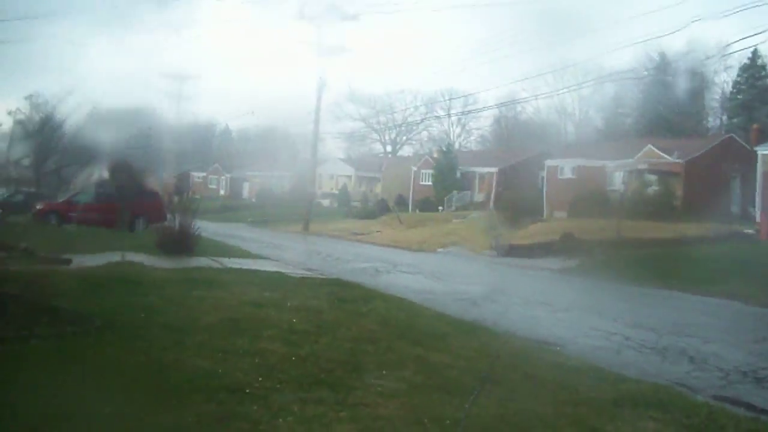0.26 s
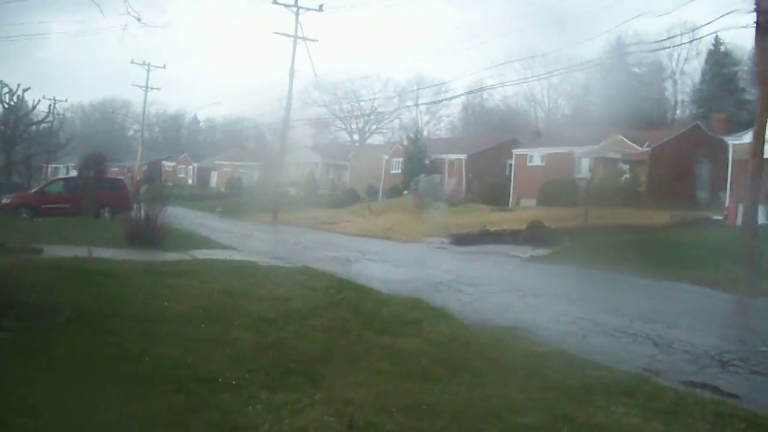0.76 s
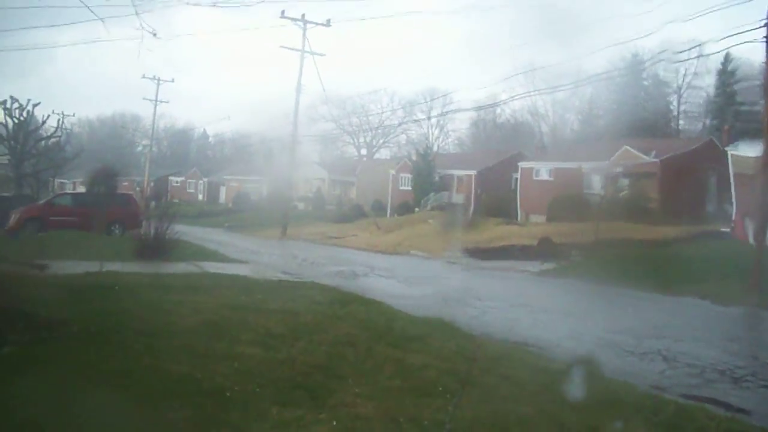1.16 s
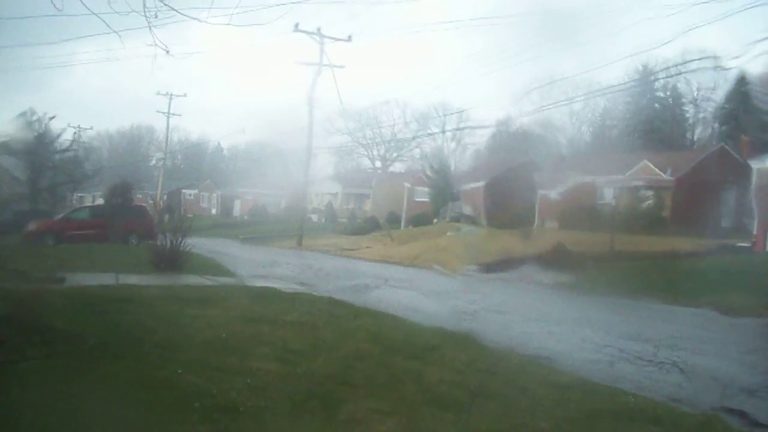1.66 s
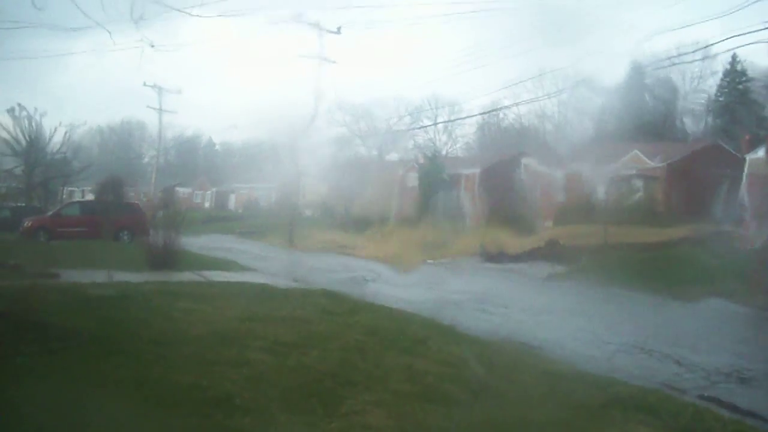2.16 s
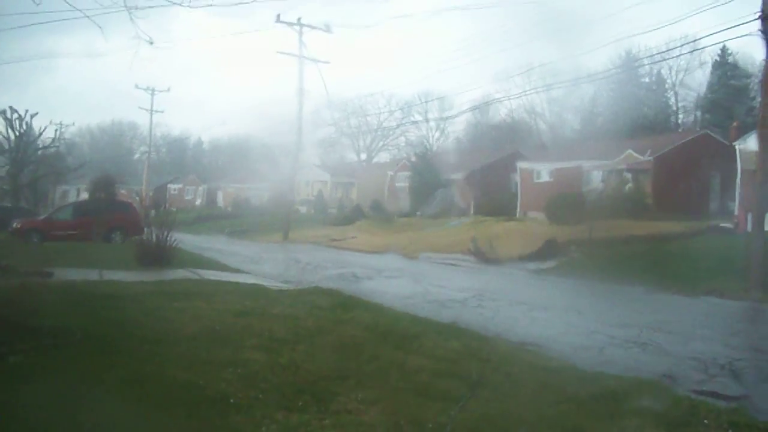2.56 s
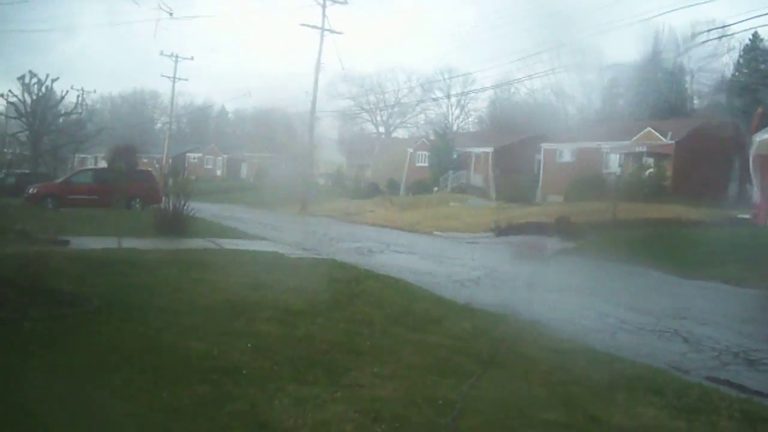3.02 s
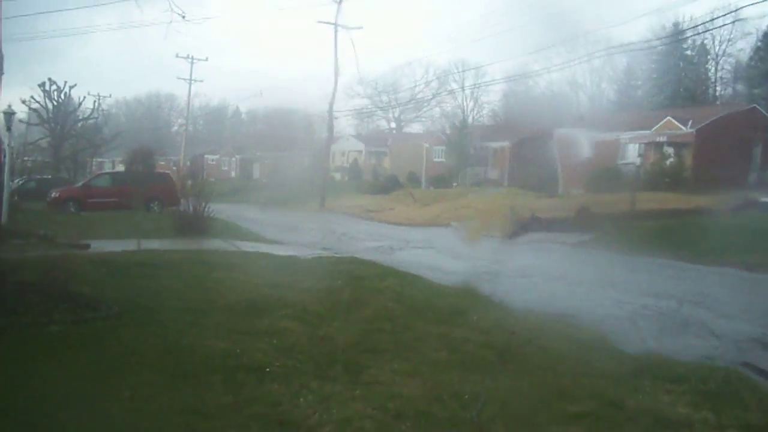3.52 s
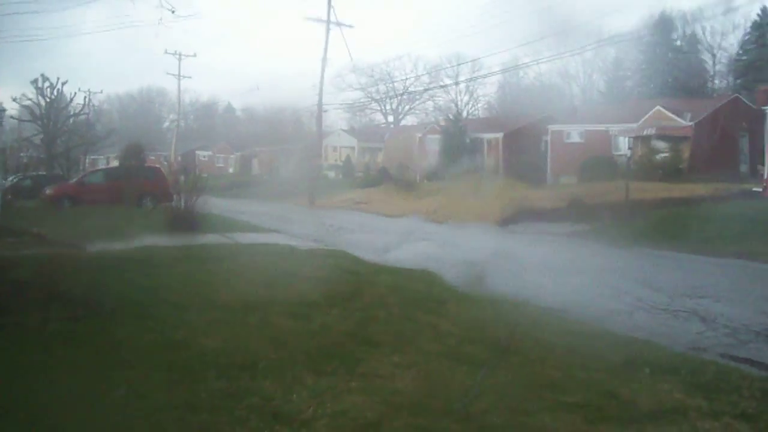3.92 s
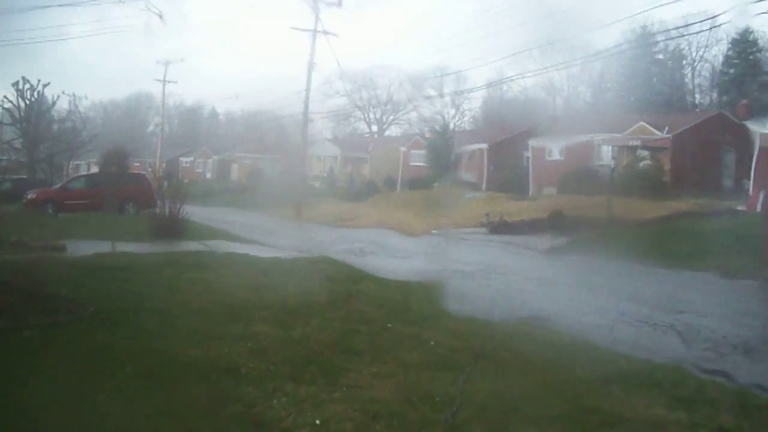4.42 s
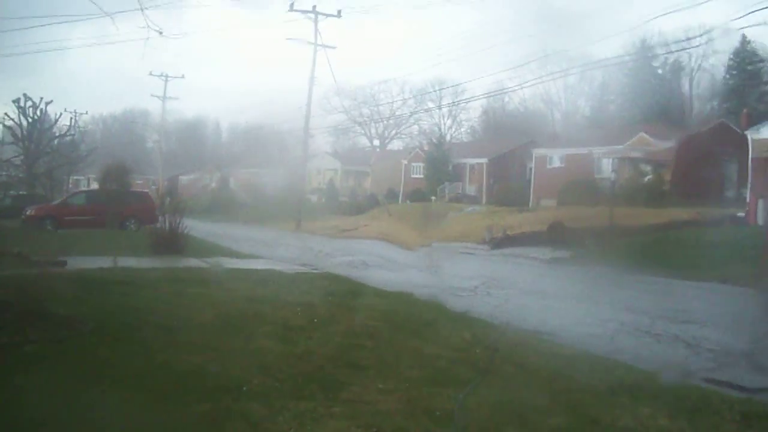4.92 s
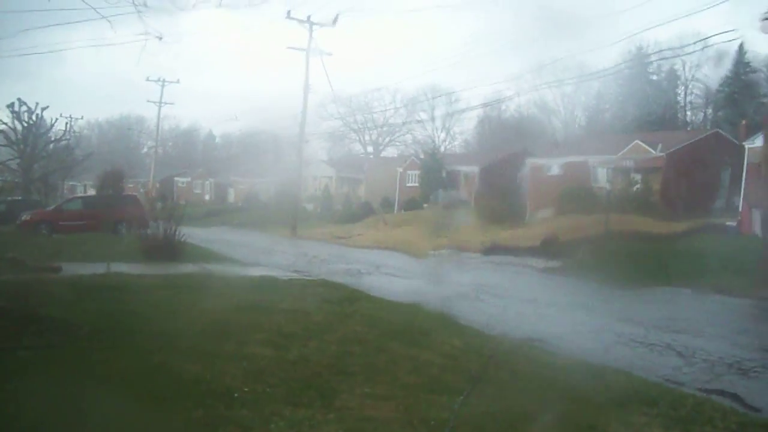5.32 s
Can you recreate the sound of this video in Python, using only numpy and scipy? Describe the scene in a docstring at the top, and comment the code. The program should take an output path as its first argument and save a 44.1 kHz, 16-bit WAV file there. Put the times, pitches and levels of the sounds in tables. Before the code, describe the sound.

Heavy rain and hail hammer a parked car, heard from inside: sharp irregular cracks and dull roof thuds over pattering, drumming and a low engine hum.

```python
"""Hail and heavy rain on a parked car with its engine idling, heard from inside the cabin.
Rain pours hard at first, with a loud stone almost at once; it lulls, swells near 0.5 s with the loudest
crack, then swells again near 1.2, 2, 3.5 and 4.7 s. Throughout, stones crack (noise shaped like glass,
plus a short tone) and thud on the roof, over pattering grains, low drumming and the engine's hum.
The microphone's gain control ducks after each loud stone, and the loudest stones clip."""
import sys
import numpy as np
from scipy import signal
from scipy.fft import rfft, irfft
from scipy.io import wavfile
from scipy.ndimage import uniform_filter1d

SR = 44100
rng = np.random.default_rng(int(sys.argv[2]) if len(sys.argv) > 2 else 0)


def dump_mix(stems):
    """Bounce the given channels to the path in sys.argv[1] as a 16-bit WAV at rate SR."""
    frames = np.atleast_2d(stems).T  # one column per channel
    limited = np.clip(frames, -1, 1)  # hard clip at full scale
    pcm = np.round(limited * 32767).astype(np.int16)
    wavfile.write(sys.argv[1], SR, pcm)


N = 246078  # length in samples

# All levels below are those ahead of the microphone's gain control. cracks and thuds of stones: [start t/s,
# crack peak level/dB, crack centre f/Hz, thud level before it dies away/dB, basic crack ring time t/s (time to
# fall 60 dB)]
CRACKS_AND_THUDS = [(0.005, -17, 1670, -19, 0.036), (0.045, 9.5, 1376, -5.5, 0.026),
                    (0.11, -10, 1140, -15.5, 0.04), (0.147, -18.5, 2010, -15, 0.029),
                    (0.206, -16.5, 3160, -22, 0.091), (0.231, -7.5, 2840, -36, 0.037),
                    (0.317, -14, 1600, -42, 0.017), (0.358, -8, 760, -6.5, 0.025),
                    (0.365, -31, 797, -3, 0.032), (0.383, -1.5, 1370, -1.5, 0.039),
                    (0.421, 1.5, 1510, -8, 0.043), (0.437, -2.5, 3070, -20, 0.034),
                    (0.488, 2, 3800, -9.5, 0.056), (0.496, 10, 4700, -39, 0.031),
                    (0.586, -13, 4130, -20.5, 0.076), (0.646, -32, 2500, -35, 0.036),
                    (0.692, -14, 891, -16, 0.081), (0.733, -7, 725, -8.5, 0.079),
                    (0.755, -1.2, 870, -18.5, .028), (0.81, -12.5, 770, -13, 0.033),
                    (0.837, -15.5, 1170, -26, 0.064), (0.862, -1, 3970, -34, 0.042),
                    (0.896, -9.5, 789, -21, 0.084), (0.973, -1.5, 6390, -59, 0.024),
                    (1.007, -13.5, 775, -15, 0.018), (1.115, 1, 3170, -17.5, 0.017),
                    (1.187, -8.5, 5560, -13, 0.063), (1.21, -10.5, 3330, -34, 0.056),
                    (1.248, 3.5, 3000, -28, 0.03), (1.327, -12.5, 1290, -22, 0.035),
                    (1.352, -2.5, 4400, -43, .045), (1.407, -15.5, 1180, -21.5, .072),
                    (1.474, -14, 1320, -17, 0.027), (1.523, -25, 2750, -42, 0.055),
                    (1.607, -8, 3250, -22, 0.06), (1.625, -2.5, 6700, -37, 0.027),
                    (1.691, -10.5, 3000, -35, 0.049), (1.698, -0.1, 5560, -43, .029),
                    (1.758, -15, 3360, -21, 0.1), (1.809, -16, 860, -31, 0.066),
                    (1.835, -17.5, 2660, -34, 0.064), (1.857, -18, 4380, -38, 0.1),
                    (1.935, -14, 5170, -34, 0.022), (1.969, -12, 770, -18, 0.042),
                    (2.011, -9, 1830, -32, 0.039), (2.03, -6, 1150, -35, 0.043),
                    (2.049, -10, 3260, -12.5, 0.049), (2.128, -11, 4860, -20, 0.057),
                    (2.142, 3.5, 4930, -28, 0.035), (2.154, -5.5, 4000, -30, 0.082),
                    (2.186, 3.6, 3440, -8, 0.029), (2.261, -15, 756, -18, .026),
                    (2.369, -28, 845, -21, 0.017), (2.422, -14, 3550, -37, 0.067),
                    (2.469, -16, 2990, -30, 0.08), (2.554, -10.5, 4000, -27, 0.059),
                    (2.621, -27, 740, -15, 0.071), (2.647, 1.5, 3800, -13, 0.024),
                    (2.748, -19, 1580, -18, 0.028), (2.771, -26, 816, -13.5, .027),
                    (2.805, 2, 3630, -12.5, 0.03), (2.847, -7, 830, -13, 0.033),
                    (2.886, -19, 4470, -32, 0.037), (2.918, -3.5, 3270, -12.5, 0.04),
                    (2.964, -20, 1310, -25, 0.062), (3.014, 2, 4500, -33, 0.02),
                    (3.063, -26, 864, -17, .031), (3.079, -4, 4030, -25, .05),
                    (3.085, 2.1, 2880, -10, 0.042), (3.134, -21.5, 1200, -33, 0.086),
                    (3.252, -25, 900, -24, 0.11), (3.349, -6, 4700, -14, 0.012),
                    (3.377, -19, 770, -18, 0.032), (3.409, -9.5, 800, -10, 0.033),
                    (3.468, -5, 1550, -10.5, 0.053), (3.531, -16, 891, -40, 0.063),
                    (3.581, 3, 1444, -12.5, 0.032), (3.631, -10, 974, -28, 0.033),
                    (3.664, -7, 1470, -6, 0.065), (3.677, -2.5, 1120, -11.5, 0.016),
                    (3.739, -26, 1990, -30, 0.036), (3.839, -8, 5020, -42, 0.049),
                    (3.867, -8.5, 6420, -33, 0.025), (3.91, -12.5, 790, -20.5, 0.018),
                    (3.973, -15, 2130, -24, 0.033), (4.025, -14.5, 726, -33, 0.025),
                    (4.197, -17, 790, -15, .031), (4.289, -6, 6500, -17.5, .041),
                    (4.311, -11, 780, -12, 0.016), (4.398, -39, 800, -16, 0.03),
                    (4.468, -5.5, 4000, -17.5, 0.017), (4.509, -22.5, 2500, -31, 0.027),
                    (4.542, -20, 3000, -37, 0.086), (4.571, -5.5, 5450, -24, 0.022),
                    (4.599, -17, 751, -31, .04), (4.635, -12.5, 1230, -10.5, 0.033),
                    (4.726, 6.5, 4770, -36, 0.03), (4.815, -14, 764, -40, 0.025),
                    (4.863, -19, 3460, -25, 0.092), (4.945, -11, 774, -25, 0.073),
                    (5.024, -19.5, 1190, -32, 0.061), (5.061, -15, 1030, -23, 0.044),
                    (5.079, 1.5, 2360, -14.5, 0.035), (5.134, -10.5, 1500, -44, 0.057),
                    (5.177, -21, 840, -15.5, .03), (5.335, -13, 3140, -21, 0.091),
                    (5.372, -17.5, 800, -24, 0.064), (5.381, -8, 1120, -16, .03),
                    (5.534, -5, 3770, -15.5, 0.036)]
# hollow knocks on a panel: [start t/s, level before rise and decay/dB]
PANEL_KNOCKS = [(0.754, -18), (1.005, -22), (1.473, -24), (1.618, -25), (2.05, -14.5), (2.621, -22),
                (2.767, -19), (2.939, -17.5), (3.408, -14), (3.467, -25), (3.677, -11), (4.196, -21.5),
                (4.311, -20), (4.4, -36), (4.596, -19.5), (5.381, -15.5)]
# how hard it pours: [t/s, basic patter on the glass level/dB, roof knocking level/dB, cabin booming level/dB]
DOWNPOUR = [(0.0, -35.5, -21, -9), (0.3, -53, -33.5, -40), (0.38, -39, -26, -8), (0.47, -32.5, -18.5, -6),
            (0.56, -43, -25, -33), (0.76, -43, -30, -19), (1.0, -42.5, -31, -37), (1.2, -35, -22, -13),
            (1.3, -44, -33.5, -36), (1.7, -41, -49.5, -38.5), (2.04, -31.5, -18, -24.5),
            (2.3, -37.5, -25.5, -21.5), (2.7, -40, -35, -25.5), (3.05, -41, -34, -22.5),
            (3.3, -40, -31.5, -37), (3.48, -30.5, -15.5, -6.5), (3.62, -35.5, -24.5, -23),
            (3.9, -39, -31.5, -38), (4.5, -46, -30, -58), (4.66, -41.5, -23.5, -12.5),
            (4.78, -41, -26, -23.5), (5.58, -43, -26, -23)]
# tone colour of cracking glass: [f/Hz, relative level per Hz/dB]
GLASS_SPECTRUM = [(290, -46), (500, 1), (1150, 4.5), (2130, 3.5), (2650, 8.5), (3260, 7.5), (6110, 6.5),
                  (7600, 2.5), (9000, -18.5), (11700, -73), (19800, -120)]
# resonances of the roof panel: [centre f/Hz, width f/Hz, relative level/dB]
ROOF_RESONANCES = [(178.5, 119, 5), (528, 197, -0.5), (1284, 26, -9.5)]
# tone colour of the rain hiss: [f/Hz, relative level per Hz/dB]
HISS_SPECTRUM = [(180, -26), (300, 10), (410, 2), (515, 6), (1020, -10.5), (2140, -15.5), (2760, -13.5),
                 (6220, -14.5), (7590, -17), (9000, -72), (11700, -117), (19800, -120)]
# patches that small grains land on: [centre f/Hz, relative level/dB]
GRAIN_PATCHES = [(900, 2.5), (2000, 1.5), (3500, 2), (6000, -4)]
# tone colour of the engine's wash of noise: [f/Hz, relative level per Hz/dB]
WASH_SPECTRUM = [(10, -65.5), (20, -17), (32, 4), (50, 3.5), (85, -1.5), (120, -10.5), (150, 2), (200, -7),
                 (320, -10), (600, -54), (1500, -98)]
# tone colour of the rocking car body: [f/Hz, relative level per Hz/dB]
SWAY_SPECTRUM = [(1, -25), (5, 2), (10, 2), (14, -6), (20, -3), (30, -12), (45, -30), (120, -100)]
# engine hum: [multiple of the firing cycle, average level/dB]
HUM_ORDERS = [(6, -54), (8, -25), (9, -44.5), (13, -55.5), (14, -39.5), (16, -39), (18, -41.5)]
# uneven cylinders shake the mounts: [multiple of the firing cycle, average level/dB]
SHUDDER_ORDERS = [(2, -27), (3, -26)]

# small stones, scattered by chance
SMALL_PER_S, SMALL_T60_S = 6, 0.039
SMALL_DB, SMALL_SPREAD_DB = -32.5, 6  # crack level: a base, and how strongly chance changes it
SMALL_THUD_DB = 1  # thud compared with the crack
SMALL_LOW_HZ, SMALL_HIGH_HZ = 750, 3520
# higher cracks spread over more of the glass's modes: share at 1 kHz, and growth per octave
BROAD_AT_1K, BROAD_PER_OCTAVE = 0.29, 0.17
# the struck spot rings briefly, most under hard stones
PING_STRENGTH, PING_RISE_S = 0.85, 0.0003  # strength for a stone with the hard ring time below
HARD_T60_S = 0.024
PING_T60_AT_1K_S, PING_LAW = 0.019, 0.46  # higher spots ring for less time
KNOCK_T60_S, KNOCK_RISE_S, KNOCK_LOW_HZ = 0.14, 0.0048, 378
FAR_RAIN_DB = -44.5  # rain on the street
CYCLE_HZ = 8.13  # average firing cycles a second at idle
WASH_DB, SWAY_DB = -29, -24.5
MIC_HZ, EDGE_HZ = 8595, 16400  # upper limits before and after the gain control


def gain_of(db):
    """Turns decibels into an amplitude."""
    return 10 ** (np.asarray(db) / 20)


def evened(x):
    """Scales a sound to an average (rms) level of 1 along time."""
    return x / np.sqrt(np.mean(x ** 2, axis=-1, keepdims=True) + 1e-20)


def read(points, hz):
    """Reads a spectrum table between its points, on a log-frequency axis."""
    f, value = np.transpose(points)
    return np.interp(np.log(hz + 1), np.log(f + 1), value)


def curve(table, column):
    """Reads one column of a timed table at every sample."""
    return np.interp(np.arange(N) / SR, [row[0] for row in table], [row[column] for row in table])


def coloured(x, gain):
    """Filters a sound by gain(hz) and scales it to rms 1."""
    size = x.shape[-1]
    return evened(irfft(rfft(x) * gain(np.fft.rfftfreq(size, 1 / SR)), size))


def near(hz, centre_hz, octaves):
    """Gives a bell shape around a centre on the octave scale."""
    return np.exp(-(np.log2((hz + 1) / centre_hz) / octaves) ** 2)


def fading(t, t60):
    """Dies away by 60 dB in t60 seconds."""
    return gain_of(-60 * t / t60)


def rising(t, rise):
    """Swells smoothly from 0 towards 1, as a struck body starts to move."""
    return 1 - np.exp(-t / rise)


def roof_gain(hz):
    """Adds up the power of the panel resonances and leaves out the deep bass."""
    power = sum(gain_of(2 * db) / (1 + (2 * (hz - f) / width) ** 2) for f, width, db in ROOF_RESONANCES)
    return np.sqrt(power) * hz ** 2 / (hz ** 2 + 110 ** 2)


def wander(hz):
    """Makes a slow random drift of rms 1, mostly below hz."""
    return coloured(rng.standard_normal(N), lambda f: 1 / (1 + (f / hz) ** 2))


def pelting(per_s, spread_db, t60, rise):
    """Adds up the power of random uneven blows that die away; returns an amplitude of rms 1."""
    power = gain_of(2 * spread_db * np.minimum(rng.exponential(1, N), 4))
    blows = power * (rng.random(N) < per_s / SR)
    t = np.arange(SR // 4) / SR
    ring = gain_of(-120 * t / t60) * rising(t, rise)  # power falls twice as fast as amplitude
    return evened(np.sqrt(abs(signal.oaconvolve(blows, ring)[:N])))


def hailfall():
    """Lists the cracks and thuds of the table, then small stones that chance scatters between them."""
    when, size, place = rng.random((int(SMALL_PER_S * N / SR), 3)).T
    crack_db = SMALL_DB - SMALL_SPREAD_DB * np.log(size + 0.054)
    centre_hz = SMALL_LOW_HZ * (SMALL_HIGH_HZ / SMALL_LOW_HZ) ** place ** 2
    small = [when * N / SR, crack_db, centre_hz, crack_db + SMALL_THUD_DB, SMALL_T60_S + 0 * when]
    return np.hstack([np.transpose(CRACKS_AND_THUDS), small])


def stones():
    """Stones shake the dense modes of the glass near a centre, and the roof more slowly."""
    start_s, crack_db, centre_hz, thud_db, t60 = hailfall()[:, :, None]
    broad = np.clip(BROAD_AT_1K + BROAD_PER_OCTAVE * np.log2(centre_hz / 1000), 0.03, 1)
    t60 = np.clip(t60, 0.01, 0.3)
    t = np.arange(8192) / SR
    glass_noise, roof_noise = np.moveaxis(rng.standard_normal((len(start_s), 2, len(t))), 1, 0)

    def glass_gain(hz):
        """Mixes the whole glass spectrum with the part near the struck spot."""
        return gain_of(read(GLASS_SPECTRUM, hz)) * (broad + (1 - broad) * near(hz, centre_hz, 0.64))

    glass = coloured(glass_noise, glass_gain)
    low_pass = 1 + (np.fft.rfftfreq(len(t), 1 / SR) / 2300) ** 4
    low = irfft(rfft(glass) / low_pass, len(t))
    high = glass - low
    cabin = gain_of(-20.5) * fading(t, 0.069)  # a weaker, longer tail
    rise = 0.71 * t60 ** 2  # hard stones are short and sudden, slushy ones long and soft

    # high modes snap at once and die first; low modes ring longer
    high_decay = 0.39 * fading(t, 0.32 * t60) + fading(t, t60) + cabin
    snap = high * high_decay * rising(t, rise)
    ring = low * (fading(t, 1.63 * t60) + cabin) * rising(t, 0.6 * rise)
    body = snap + ring

    ping_t60 = PING_T60_AT_1K_S * (1000 / centre_hz) ** PING_LAW
    ping = np.sin(2 * np.pi * centre_hz * t) * fading(t, ping_t60) * rising(t, PING_RISE_S)
    ping_level = PING_STRENGTH * (HARD_T60_S / t60) ** 0.81
    crack = body / abs(body).max(axis=1, keepdims=True) + ping_level * ping
    crack = gain_of(crack_db) * crack / abs(crack).max(axis=1, keepdims=True)

    thud = gain_of(thud_db) * coloured(roof_noise, roof_gain) * fading(t, 0.098) * rising(t, 0.003)
    out = np.zeros(N + len(t))
    for start, sound in zip(start_s[:, 0], crack + thud):
        out[round(start * SR):][:len(t)] += sound
    return out[:N]


def knocks():
    """Stones on a hollow panel ring its upper resonances, without boom and longer than a thud."""
    t = np.arange(12000) / SR
    out = np.zeros(N + len(t))
    noise = rng.standard_normal((len(PANEL_KNOCKS), len(t)))
    body = coloured(noise, lambda hz: roof_gain(hz) / (1 + (KNOCK_LOW_HZ / (hz + 1)) ** 6))
    body = body * fading(t, KNOCK_T60_S) * rising(t, KNOCK_RISE_S)
    for (start, db), sound in zip(PANEL_KNOCKS, body):
        out[round(start * SR):][:len(t)] += gain_of(db) * sound
    return out[:N]


def patter():
    """Small grains tick on patches of different pitch, drops crackle, and far rain hisses evenly."""
    def hiss_gain(hz):
        """Gives the tone colour of rain."""
        return gain_of(read(HISS_SPECTRUM, hz))

    sheet, far = coloured(rng.standard_normal((2, N)), hiss_gain)
    close = gain_of(2.5) * sheet * pelting(500, 9.1, 0.0069, 0.000088)
    for centre_hz, db in GRAIN_PATCHES:
        patch = coloured(rng.standard_normal(N), lambda hz: hiss_gain(hz) * near(hz, centre_hz, 0.97))
        close += gain_of(db) * patch * pelting(110, 2.56, 0.064, 0.00065)
    far = coloured(far, lambda hz: (hz / 1000) ** 0.15)  # slightly brighter
    return gain_of(curve(DOWNPOUR, 1)) * close + gain_of(FAR_RAIN_DB) * far


def drumming():
    """Many blows on the roof blend into a lumpy roll: knocks above about 300 Hz, a boom below."""
    blows = 0.082 + 0.5 * pelting(50, 0.57, 0.75, 0.0015)
    knock = coloured(rng.standard_normal(N), lambda hz: roof_gain(hz) / (1 + (300 / (hz + 1)) ** 4))
    boom = coloured(rng.standard_normal(N), lambda hz: roof_gain(hz) / (1 + (hz / 300) ** 4))
    return blows * (gain_of(curve(DOWNPOUR, 2)) * knock + gain_of(curve(DOWNPOUR, 3)) * boom)


def engine():
    """Hums at multiples of a slightly wavering firing cycle, over a wash of noise and body rocking."""
    turns = np.cumsum(CYCLE_HZ + 0.029 * wander(1.0)) / SR
    hum = np.zeros(N)
    for multiple, db in SHUDDER_ORDERS + HUM_ORDERS:
        level = gain_of(db + 0.56 * wander(21.0)) * np.sqrt(2)  # rms to peak
        hum += level * np.sin(2 * np.pi * (multiple * turns + rng.random()))
    wash = coloured(rng.standard_normal(N), lambda hz: gain_of(read(WASH_SPECTRUM, hz)))
    sway = coloured(rng.standard_normal(N), lambda hz: gain_of(read(SWAY_SPECTRUM, hz)))
    return hum + gain_of(WASH_DB) * wash + gain_of(SWAY_DB) * sway


def scene():
    """Adds up all sources at the one microphone."""
    return (stones() + knocks() + patter() + drumming() + engine())[None]


def record(dry):
    """Limits the treble, turns the gain down after peaks, clips, shifts and limits the treble again."""
    mic_filter = signal.firwin(161, MIC_HZ, window=("kaiser", 8), fs=SR)
    mic = signal.oaconvolve(dry, mic_filter[None], "same")
    power = uniform_filter1d(mic[0] ** 2, size=88, origin=43)  # average over the last 2 ms
    level_db = 10 * np.log10(abs(power) + 1e-12)
    fall = np.arange(N) * 39.0 / SR  # the held peak level sinks by 39 dB a second
    held_db = np.maximum.accumulate(level_db + fall) - fall
    over_db = np.maximum(held_db + 15.5, 0)  # only peaks above -15.5 dB count
    lag = np.exp(-1 / (0.0095 * SR))  # the gain needs about 10 ms to follow
    duck_db = 0.85 * signal.lfilter([1 - lag], [1, -lag], over_db)
    ducked = mic / gain_of(duck_db)
    clipped = np.clip(ducked, -0.7, 0.74) - 0.02  # uneven limits and a small offset
    edge_filter = signal.firwin(255, EDGE_HZ, window=("kaiser", 9), fs=SR)
    return signal.oaconvolve(clipped, edge_filter[None], "same")


dry = scene()
out = record(dry)
dump_mix(out)
```